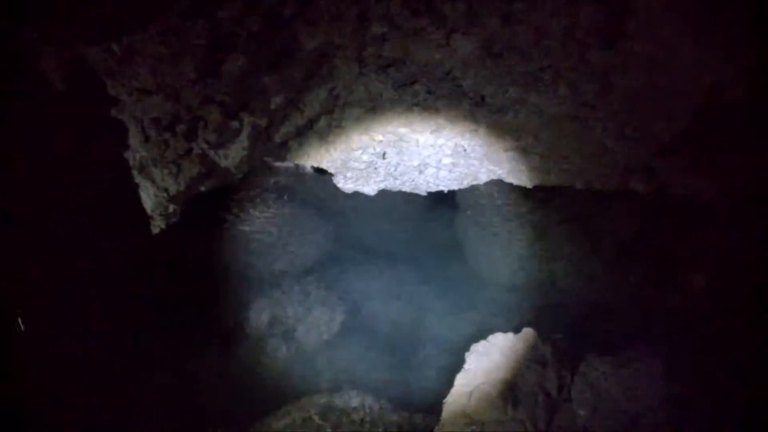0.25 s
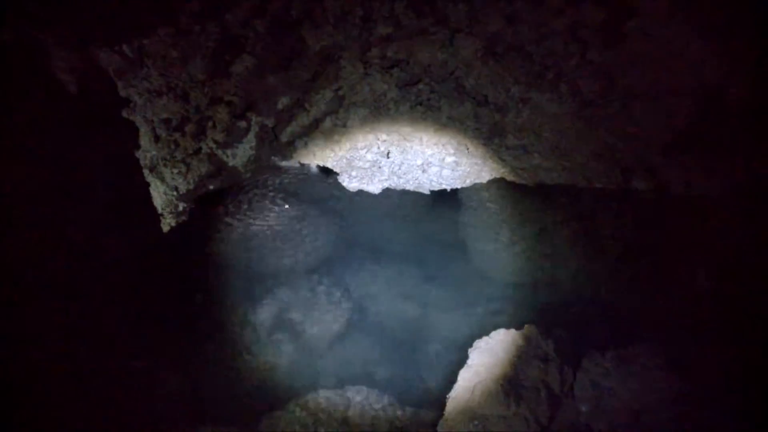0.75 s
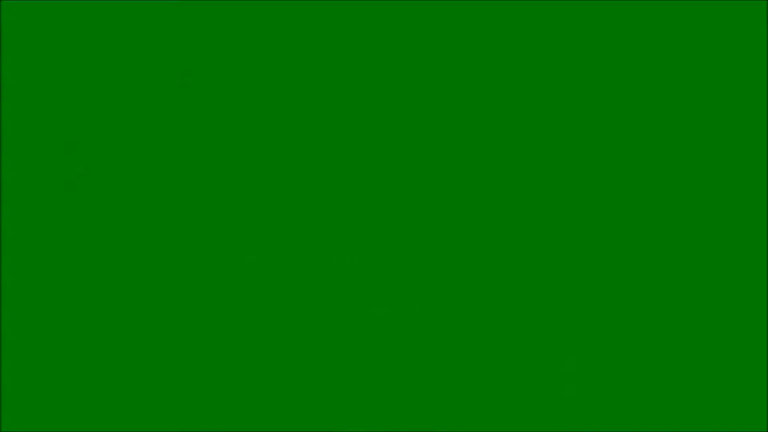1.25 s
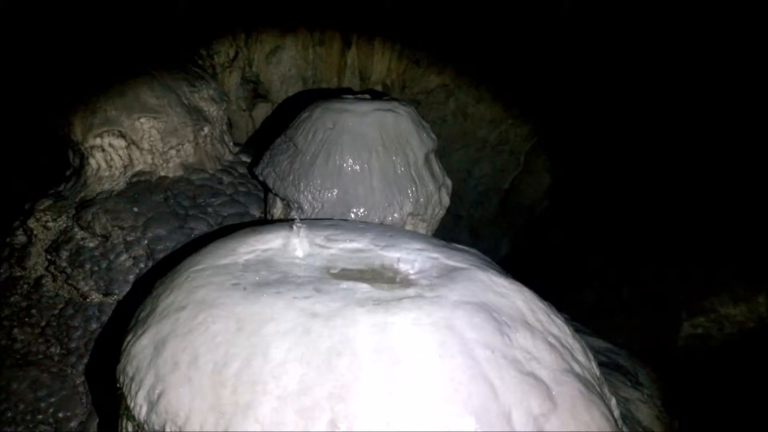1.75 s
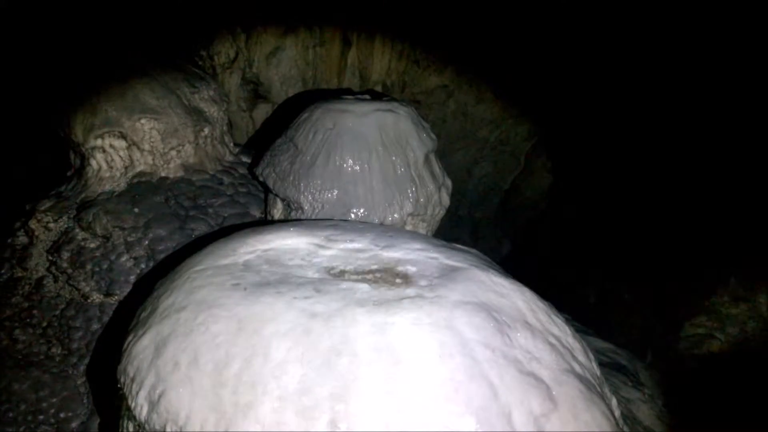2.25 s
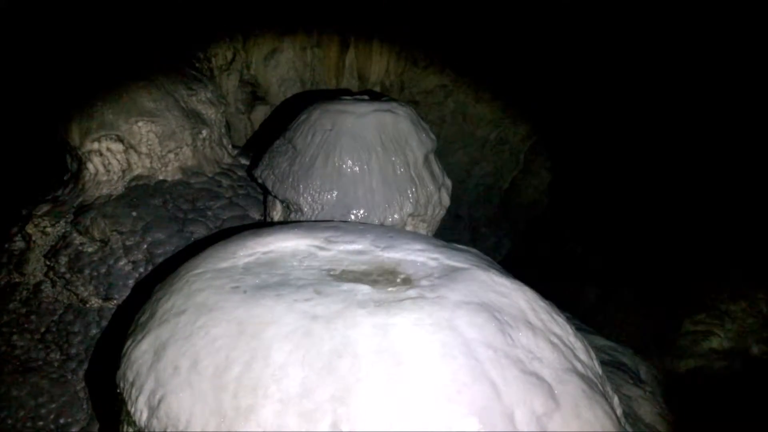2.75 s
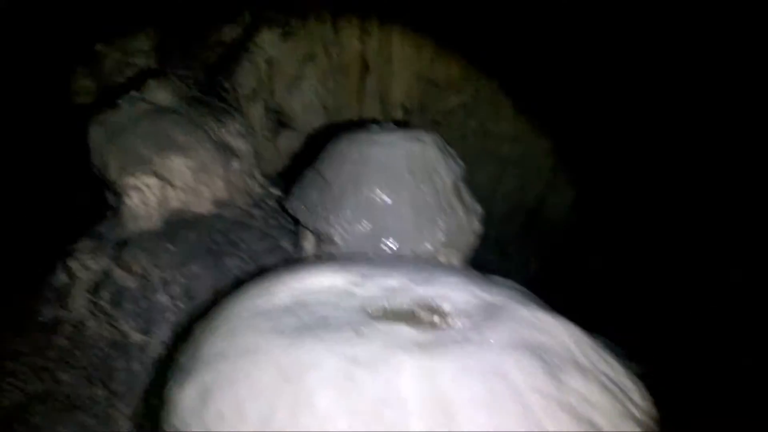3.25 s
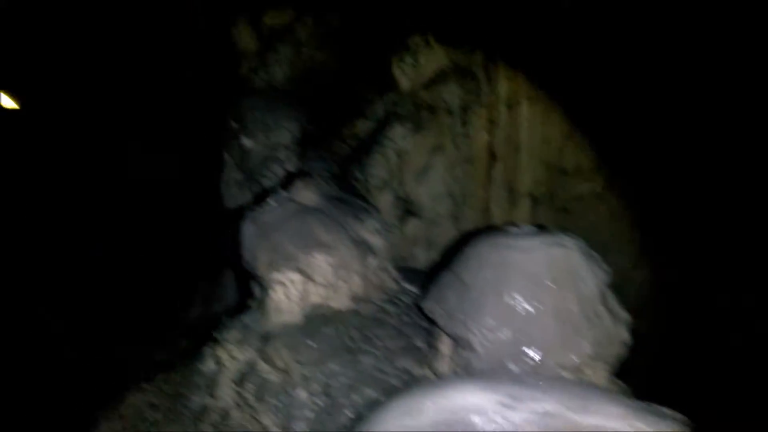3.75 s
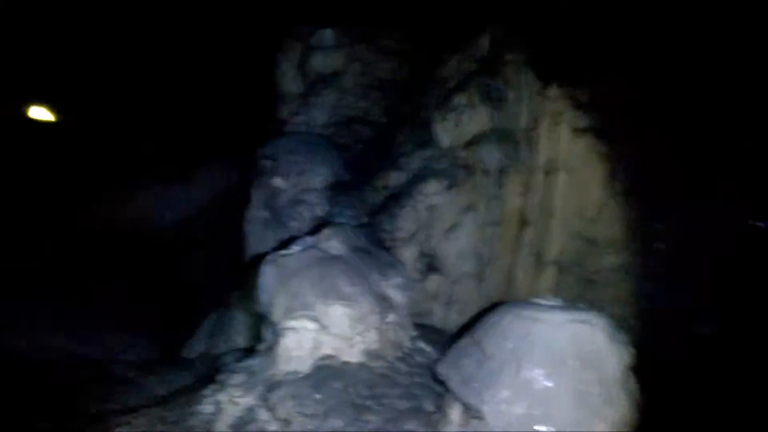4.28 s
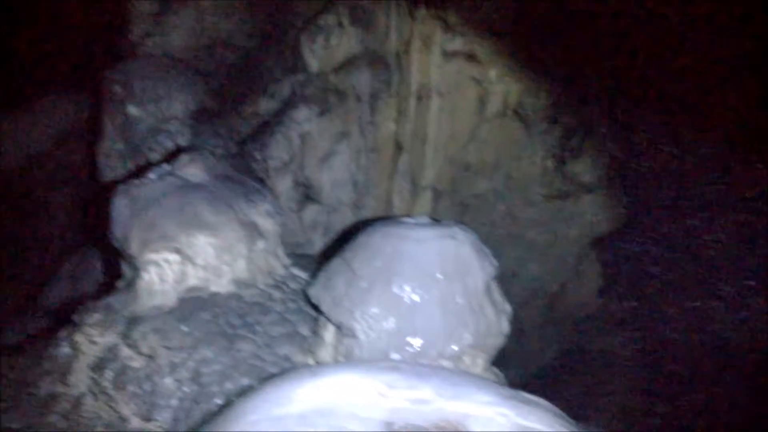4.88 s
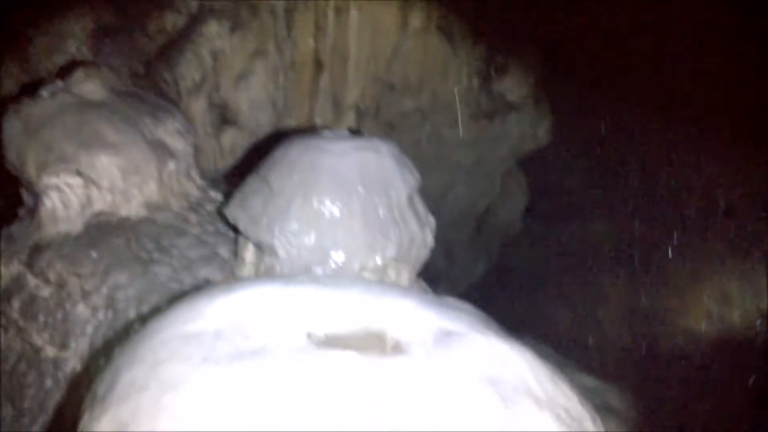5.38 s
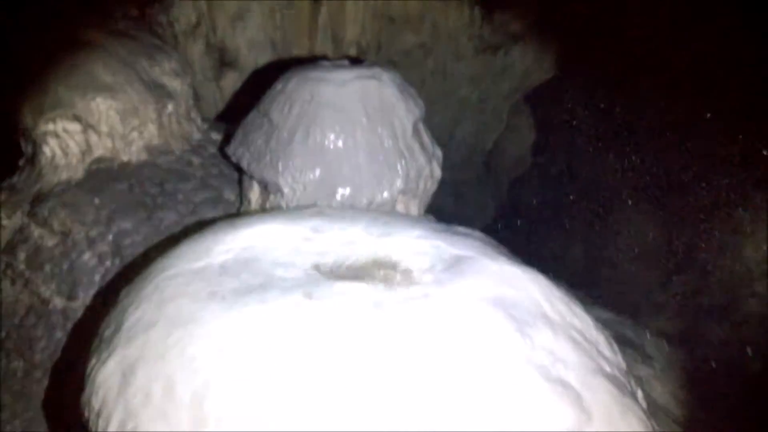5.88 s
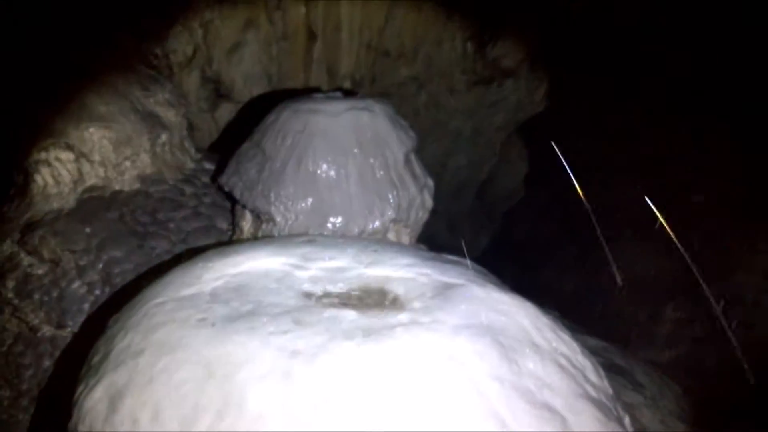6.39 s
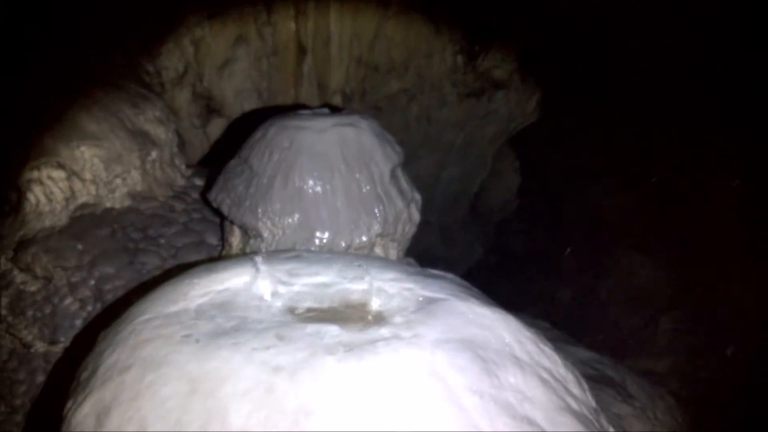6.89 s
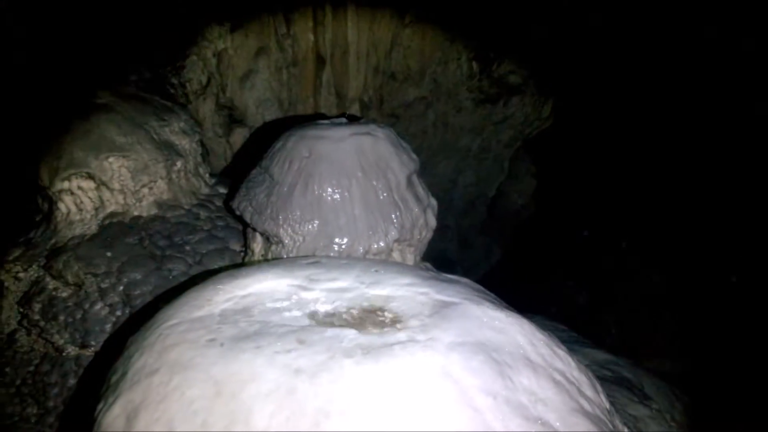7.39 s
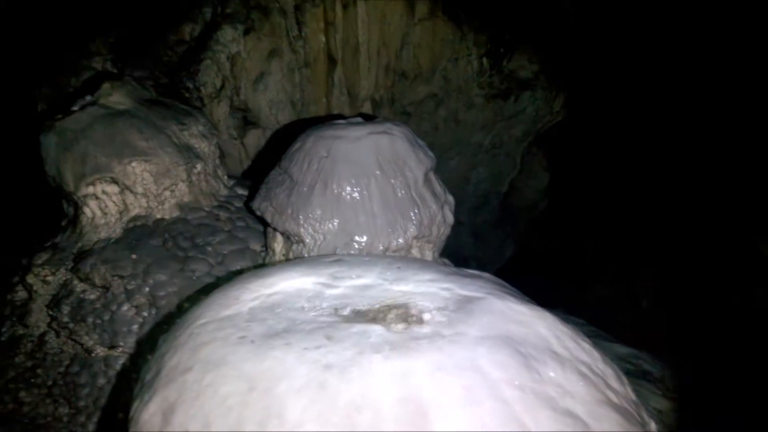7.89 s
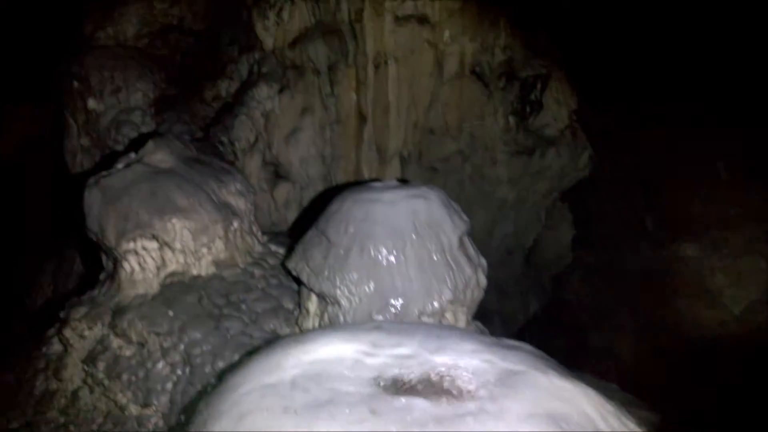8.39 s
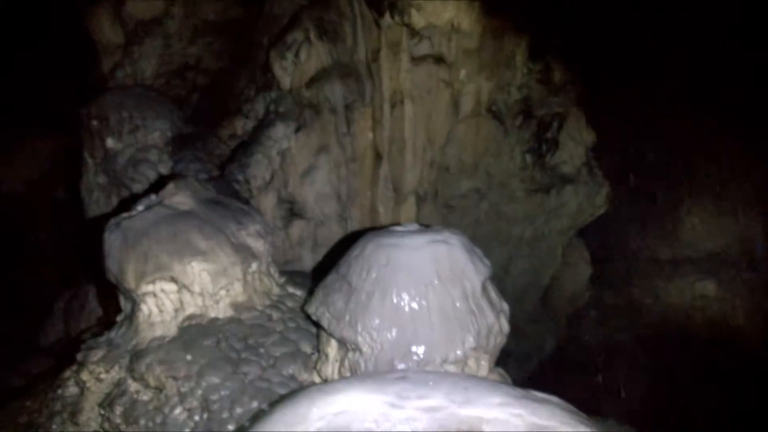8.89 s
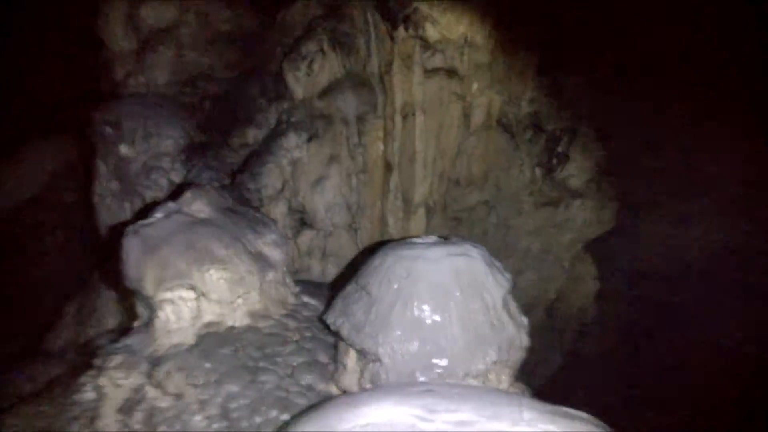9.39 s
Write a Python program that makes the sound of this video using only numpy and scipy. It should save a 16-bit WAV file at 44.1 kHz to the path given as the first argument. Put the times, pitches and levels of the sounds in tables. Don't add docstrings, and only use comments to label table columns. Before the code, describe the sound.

Inside a cave, water runs over rocks in a dense, even hiss, with countless tiny bubbles and splashes blurred together by the walls. After about a second the sound drops abruptly into a quarter-second silence, then the same water resumes at another spot, a little duller on top. A hand-held stereo recorder is close by, its left side muffled and its right side brighter.

```python
import sys
import numpy as np
from scipy import signal
from scipy.fft import rfft, irfft, next_fast_len
from scipy.io import wavfile
from scipy.ndimage import uniform_filter1d

SR = 44100
rng = np.random.default_rng(int(sys.argv[2]) if len(sys.argv) > 2 else 0)


def store_wav(level_fs):
    pcm = np.round(np.clip(np.atleast_2d(level_fs), -1, 1) * 32767)
    wavfile.write(sys.argv[1], SR, pcm.T.astype(np.int16))


def gain_from_db(level_db):
    decades = np.asarray(level_db, float) / 20
    return 10 ** decades


N = 425105
CUT_S, RESUME_S = 1.04186, 1.28630


def unit(x):
    return x / np.sqrt(np.mean(x ** 2) + 1e-20)


def along(points, hz):
    point_hz, value = np.transpose(points)
    return np.interp(np.log(hz + 1), np.log(point_hz + 1), value)


def filtered(x, response):
    m = next_fast_len(N + 8192)
    return irfft(rfft(x, m) * response(np.fft.rfftfreq(m, 1 / SR)), m)[..., :N]


def smooth_field(shape, bins, frames):
    field = uniform_filter1d(rng.standard_normal(shape), size=bins, axis=0)
    return unit(uniform_filter1d(field, size=frames, axis=1))


def patchy(x, patchy_db):
    z = signal.stft(x, nperseg=512)[2]
    gain = gain_from_db(patchy_db * smooth_field(z.shape[-2:], bins=6, frames=14))
    return unit(signal.istft(z * gain, nperseg=512)[1][..., :N])


def bubbles(count, cycles, rise, spread_db):
    when, pitch, size = rng.random((count, 3)).T
    bubble_hz = (300 + 14000 * pitch ** 2)[:, None]
    sample = np.arange(256)
    turns = bubble_hz * sample / SR
    climb = 1 + rise * np.minimum(turns / cycles, 1)
    ring = np.sin(2 * np.pi * turns * climb) * turns * np.exp(-3 * turns / cycles)
    ring = ring * np.sqrt(bubble_hz) * gain_from_db(-spread_db * np.log(1 - size))[:, None]
    index = (when * N).astype(int)[:, None] + sample
    x = np.bincount(index.ravel(), ring.ravel(), N + 256)[:N]
    f, power = signal.welch(x, SR, nperseg=256)
    floor = 0.00077 * power.mean()
    return unit(filtered(x, lambda hz: 1 / np.sqrt(np.interp(hz, f, power + floor))))


def water(spacing_m, lag_s, direct, own, bubbly):
    direct, own, bubbly = np.clip([direct, own, bubbly], 0, 1)
    sound_speed = 343

    def alike(hz):
        rumble = np.sqrt(1 + (45 / (hz + 1)) ** 2)
        return (1 - own) / rumble * np.sinc(2 * hz * spacing_m / sound_speed)

    def mid_side(hz):
        turn = np.arccos(alike(hz)) / 2
        return np.array([np.cos(turn), np.sin(turn)])

    def share(hz):
        return direct / (1 + (hz / 3500) ** 2)

    def straight_path(hz):
        return np.sqrt(share(hz)) * np.exp(np.outer([-1, 1], 1j * np.pi * hz * lag_s))

    mid, side = filtered(patchy(rng.standard_normal((2, N)), patchy_db=0.79), mid_side)
    walls = filtered(np.array([mid + side, mid - side]), lambda hz: np.sqrt(1 - share(hz)))
    hiss = patchy(rng.standard_normal(N), patchy_db=1.0)
    ringing = bubbles(count=16000, cycles=7, rise=.12, spread_db=2)
    stream = np.sqrt(1 - bubbly) * hiss + np.sqrt(bubbly) * ringing
    return filtered(stream, straight_path) + walls


def humming(x, modes_db):
    hz, _, z = signal.stft(x, SR, nperseg=4096)
    field = smooth_field(z.shape[-2:], bins=2, frames=4)
    depth_db = (modes_db / (1 + hz / 400) + 3 / (1 + (hz / 60) ** 2))[:, None]
    even_db = depth_db ** 2 * np.log(10) / 20
    return signal.istft(z * gain_from_db(depth_db * field - even_db), nperseg=4096)[1][..., :N]


def place(left, right, level_db, pair):
    def colour(hz):
        port_db = np.array([along(left, hz), along(right, hz)])
        return gain_from_db(level_db + port_db) / (1 + (28 / (hz + 1)) ** 4)

    return filtered(humming(pair, modes_db=2.5), colour)


def swelling(x):
    # time_s, facing_db
    facing = [
        (0, -1),
        (.4, 0),
        (.5, 2),
        (1.04, 0.5),
        (1.29, -0.7),
        (2.2, -0.1),
        (3.5, -0.54),
        (4.4, 0.1),
        (6.5, .3),
        (9.64, 0.1),
    ]
    # centre_s, pitch_hz, swell_db, length_s
    surges = [(.05, 600, -1.5, .12), (.2, 9040, 1, .08), (.75, 800, 0.5, .12), (1.01, 900, 1, .05),
              (2.15, 2200, 2, .07), (2.45, 600, 1.5, .12), (3.1, 500, -0.5, .2), (4.4, 400, 2.3, .1),
              (5.4, 700, 1, .2), (5.93, 697, 2.5, 0.044), (8.15, 597, -1.5, .15), (9.0, 350, 0.5, 0.16)]
    hz, t, z = signal.stft(x, SR, nperseg=1024)

    def bump(centre_hz, octaves):
        return np.exp(-.5 * (np.log2((hz + 1) / centre_hz) / octaves) ** 2)

    facing_db = np.outer(0.26 + bump(4780, octaves=.3), np.interp(t, *np.transpose(facing)))
    surge_db = 0
    for centre_s, pitch_hz, swell_db, length_s in surges:
        moment = np.exp(-.5 * ((t - centre_s) / length_s) ** 2)
        surge_db = surge_db + swell_db * np.outer(bump(pitch_hz, octaves=0.72), moment)
    gain = gain_from_db(surge_db + np.array([.2 * facing_db, facing_db]))
    return signal.istft(z * gain, nperseg=1024)[1][:, :N]


def coarse(port, grain, follows, jitter_db, top_band, keep_db):
    frame, grid, band, top_hz = 1024, 43, 32, 15750
    n, k = np.arange(2 * frame), np.arange(frame)
    window = np.sin(np.pi * (n + .5) / (2 * frame))[:, None]
    basis = window * np.cos(np.pi / frame * np.outer(n + .5 + frame / 2, k + .5))
    blocks = np.pad(port, (2 * frame - grid, 2 * frame - (N - grid) % frame)).reshape(-1, frame)
    lines = np.hstack([blocks[:-1], blocks[1:]]) @ basis
    power = (lines ** 2).reshape(len(lines), -1, band).mean(axis=2)
    usual = np.median(power, axis=0)
    louder = uniform_filter1d(power, size=9, axis=0) / usual
    luck = gain_from_db(jitter_db * rng.standard_normal(power.shape))
    hz = (k + .5) * SR / (2 * frame)
    band_step = np.sqrt(usual * louder ** follows) * luck
    step = np.repeat(band_step, band, axis=1) / gain_from_db(along(grain, hz))
    room = np.sqrt(louder ** (1 - follows))[:, top_band] / luck[:, top_band]
    spare = room > gain_from_db(keep_db)
    kept = (k < band * (top_band + spare[:, None])) & (hz < top_hz)
    lines = np.sign(lines) * np.floor(np.abs(lines) / step + .4054) * step * kept
    halves = lines @ basis.T * 2 / frame
    return (halves[1:, :frame] + halves[:-1, frame:]).ravel()[frame - grid:][:N]


def gap(x):
    bright_db, bright_db_per_s = -13, -2200
    dull_db, dull_s = -32, .037
    t = np.arange(N) / SR
    since = np.clip(t - CUT_S, 0, dull_s)
    dull = filtered(x, lambda hz: 1 / (1 + (hz / 2500) ** 6))
    bright_rest = x * gain_from_db(bright_db + bright_db_per_s * since)
    dull_rest = dull * gain_from_db(dull_db - 60 * (since / dull_s) ** 6)
    residue = (bright_rest + dull_rest) * (since < dull_s)
    return np.where((t < CUT_S) | (t >= RESUME_S), x, residue)


def scene():
    # pitch_hz, level_db (per Hz)
    pool_left = [(25, -22.5), (130, -12), (280, -6.5), (600, 0), (1350, -1), (1850, -5.5), (2300, 0.5),
                 (2900, -3.5), (4800, -10.5), (5600, -15), (6500, -11.5), (10000, -20), (12500, -21.5),
                 (15000, -32)]
    pool_right = [(25, -15.5), (130, -10.5), (280, -5), (600, 0.5), (1350, 1), (1850, 2), (2900, -1.5),
                  (4800, 2.5), (5600, 1), (6500, 0), (8200, -1.5), (10000, -1.5), (12500, -6.6),
                  (15000, -11.5)]
    dome_left = [(50, -14), (130, -13.5), (240, -9), (295, -5.5), (650, -1.26), (1350, -3), (1800, -4.5),
                 (2900, -6), (4800, -12.5), (5500, -15.5), (6500, -14), (10000, -23), (12500, -27.5),
                 (15000, -35)]
    dome_right = [(50, -10.5), (130, -13), (240, -6), (295, -3.5), (650, -0.5), (1350, 0.55), (2100, 3),
                  (2800, -2.5), (3500, -1), (5100, -.5), (6500, -4), (10000, -7), (12500, -13),
                  (15500, -21)]
    t = np.arange(N) / SR
    pool_water = water(spacing_m=.115, lag_s=-.0002, direct=.15, own=0.33, bubbly=0.2)
    pool = place(pool_left, pool_right, -26.5, pool_water)
    dome_water = water(spacing_m=.115, lag_s=.00038, direct=.2, own=0.14, bubbly=.2)
    dome = place(dome_left, dome_right, -26.5, dome_water)
    return swelling(np.where(t < (CUT_S + RESUME_S) / 2, pool, dome))


def low_pass(x):
    return signal.sosfilt(signal.butter(12, 16000, fs=SR, output="sos"), x)


def record(dry):
    # pitch_hz, level_over_step_db
    left_grain = [(1400, 30), (2300, 10), (3000, 2), (4000, -2), (5500, -5.5), (6500, -4.5), (8000, -6.5),
                  (10000, -7), (12500, -8), (14000, -9.5), (15000, -13)]
    right_grain = [(1400, 30), (2300, 11), (3000, 3), (4500, 6.5), (7600, 4.5), (10300, 3.5), (12500, 0),
                   (14500, -5), (15600, -8)]
    left = coarse(dry[0], left_grain, follows=0.98, jitter_db=1.1, top_band=21, keep_db=-1.0)
    right = coarse(dry[1], right_grain, follows=0.42, jitter_db=1.4, top_band=22, keep_db=.3)
    return low_pass(gap(np.array([left, right])))


dry = scene()
out = record(dry)
store_wav(out)
```